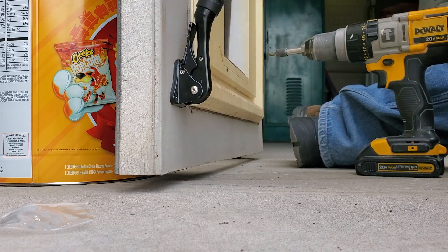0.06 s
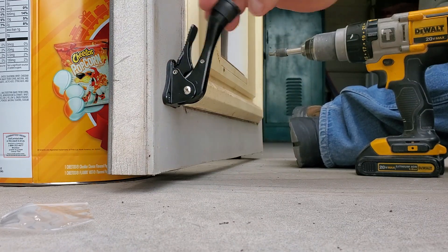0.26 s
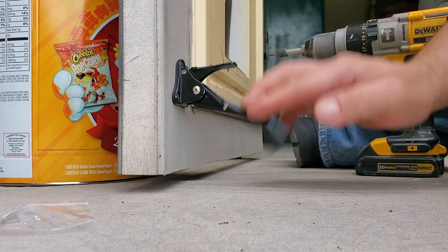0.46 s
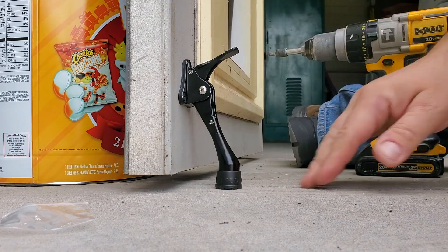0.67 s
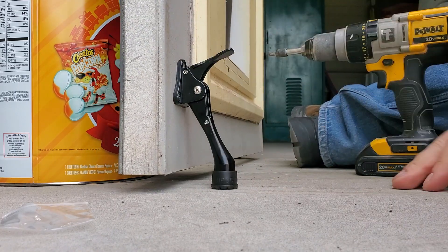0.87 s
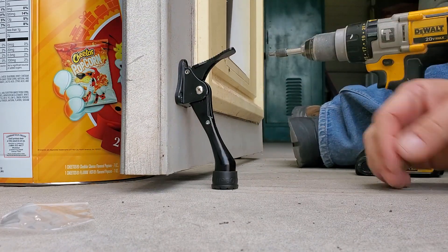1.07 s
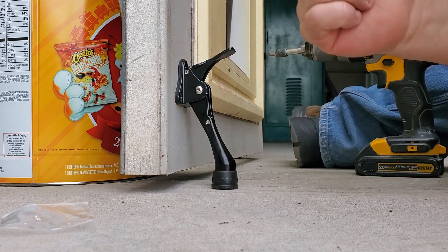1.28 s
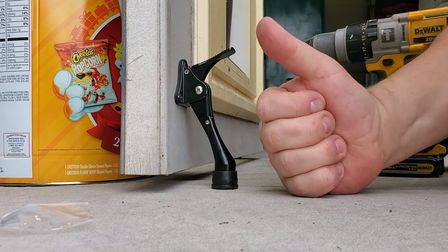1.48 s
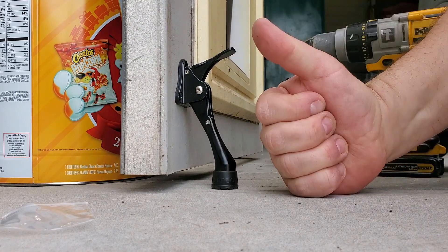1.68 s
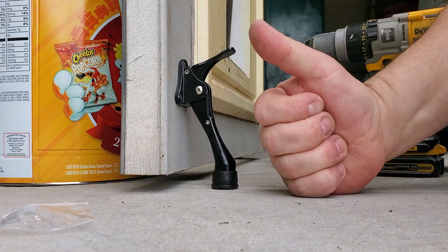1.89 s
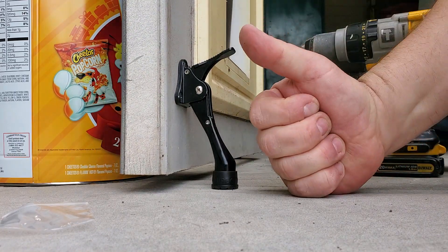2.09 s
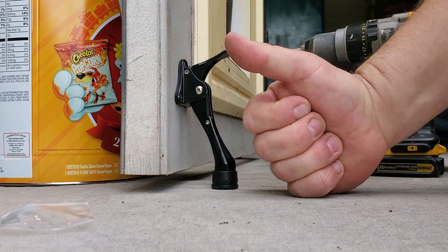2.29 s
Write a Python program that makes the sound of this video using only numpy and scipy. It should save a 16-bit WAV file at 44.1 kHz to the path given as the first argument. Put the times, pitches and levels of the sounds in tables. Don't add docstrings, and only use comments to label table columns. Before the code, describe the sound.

Sharp metallic clacks of a door stop flipping down, then one fleshy fist knock, over low engine hum.

```python
import sys
import numpy as np
from scipy import signal
from scipy.fft import rfft, irfft, next_fast_len
from scipy.io import wavfile

SR = 44100
rng = np.random.default_rng(int(sys.argv[2]) if len(sys.argv) > 2 else 0)


def undo_db(level):
    steps = np.asarray(level, float) / 20
    return 10 ** steps


def materialize(psi):
    bounded = np.clip(np.atleast_2d(psi).T, -1, 1)
    quanta = np.round(bounded * 32767).astype(np.int16)
    wavfile.write(sys.argv[1], SR, quanta)


N = 102885
SIZE = next_fast_len(N + 4096)

# [pitch_hz, level_db]
BRIGHT_HISS = [(5000, -51), (8500, -5), (11000, 0), (12200, 4), (13500, -2.5), (16000, -4)]


def rms_one(x):
    return x / np.sqrt(np.mean(x ** 2) + 1e-20)


def in_time(rows):
    return np.interp(np.arange(N) / SR, *np.transpose(rows))


def at_hz(points):
    hz, value = np.transpose(points)
    grid_hz = np.arange(SIZE // 2 + 1) * SR / SIZE
    return np.interp(np.log(grid_hz + 1), np.log(np.maximum(hz, 1)), value)


def colour(x, points):
    closed = [(points[0][0] / 2, -80), *points, (points[-1][0] * 2, -80)]
    return irfft(rfft(x, SIZE) * undo_db(at_hz(closed)), SIZE)[..., :N]


def drift(rate_hz):
    r = np.exp(-2 * np.pi * rate_hz / SR)
    warm_up = SR
    noise = rng.standard_normal(N + warm_up)
    return rms_one(signal.lfilter([1], [1, -2 * r, r * r], noise)[warm_up:])


def decay(x, t60_s):
    return signal.lfilter([1], [1, -undo_db(-60 / (t60_s * SR))], x + 1e-18)


def spikes(start_s, heights):
    return np.bincount((np.ravel(start_s) * SR).astype(int), np.ravel(heights), N)[:N]


def strike(start_s, level_db, modes, cycles=1.9, turn=-1):
    out = np.zeros(N)
    for k, (hz, mode_db, t60_s) in enumerate(modes):
        scatter_db = rng.normal(0, 1.5, len(start_s))
        hits = spikes(start_s, undo_db(level_db + mode_db + scatter_db)) * turn ** k + 1e-18
        w = 2 * np.pi * hz / SR
        build = np.exp(-2 * hz / SR / cycles)
        r = undo_db(-60 / (t60_s * SR))
        push = signal.lfilter([1 - build, 0, build - 1], [1, -2 * build * np.cos(w), build ** 2], hits)
        out += signal.lfilter([0, np.sin(w)], [1, -2 * r * np.cos(w), r * r], push)
    return out


def place(x, share):
    # [pitch_hz, lead_radians]
    left_lead = [(300, 1.05), (700, 0.68), (1060, 2.06), (2050, 1.18), (3200, 2.12), (12000, 1.2)]
    # [left_s, right_s, level_db]
    doorway_echoes = [(.0021, 0.0043, -14), (.0052, .0043, -22), (.0083, .0097, -26), (.0131, 0.013, -27)]
    right = irfft(rfft(x, SIZE) * np.exp(-1j * share * at_hz(left_lead)), SIZE)[:N]
    out = np.array([x, right])
    for k, (left_s, right_s, db) in enumerate(doorway_echoes):
        echo = np.array([np.roll(x, int(left_s * SR)), np.roll(x, int(right_s * SR))])
        out = out + share * (-1) ** k * undo_db(db) * echo
    return out


def wide_noise(points):
    # [pitch_hz, likeness from -1 to 1]
    likeness = [(60, 0.98), (130, 0.99), (290, 0.77), (640, 0.22), (1410, -0.73), (3100, 0.37),
                (6820, -0.22), (15000, -0.39)]
    alike = at_hz(likeness)
    mid, side = rfft(rng.standard_normal((2, SIZE)))
    pair = np.sqrt(1 + alike) * mid + np.sqrt(1 - alike) * side * [[1], [-1]]
    return rms_one(colour(irfft(pair, SIZE), points))


def street():
    # [pitch_hz, level_db]
    rumble_colour = [(15, -11), (25, -38), (43, -3.5), (107, -0.5), (129, -7.5), (162, -7.5), (221, -17),
                     (375, -22.5), (500, -25), (650, -63), (1100, -120)]
    # [pitch_hz, level_db]
    wash_colour = [(300, 4), (500, -0.5), (900, 4), (2000, -3), (3500, -16.5), (7000, -25), (7800, -32),
                   (16000, -95.5)]
    # [time_s, level_db]
    wash_level = [(0.0, -44.5), (2.0, -46), (2.33, -41)]
    # [pitch_hz, level_db]
    hiss_colour = [(8000, -14), (10500, -6), (12000, 0), (13500, -8), (14600, -14), (16000, -15)]
    rumble = undo_db(-34 + 1.2 * drift(8)) * wide_noise(rumble_colour)
    wash = undo_db(in_time(wash_level) + 0.13 * drift(24)) * wide_noise(wash_colour)
    hiss = undo_db(-73) * wide_noise(hiss_colour)
    return rumble + wash + hiss


def engine():
    # [time_s, firing_hz, half_pitch_db, firing_pitch_db]
    course = np.array([(0, 112.8, -49, -46.5), (.45, 114, -37, -36), (.9, 107.2, -43.5, -36.5),
                       (1.22, 110.1, -32, -38), (1.45, 113.4, -45.5, -39.5), (1.802, 106, -40.5, -41.5),
                       (2.33, 102.8, -37, -46)])
    hz, half_db, firing_db = (in_time(course[:, [0, k]]) for k in (1, 2, 3))
    turns = 2 * np.pi * np.cumsum(hz * (1 + 0.02 * drift(4.04))) / SR
    hum = np.zeros(N)
    for order, db in ((0.5, half_db), (1, firing_db)):
        wobble_db = 3.5 * drift(0.93)
        hum += undo_db(db + wobble_db) * np.sin(order * turns)
    return np.sqrt(2) * hum


def stroke(start_s, hold_s):
    t = np.arange(N) / SR
    rise = np.clip((t - start_s) / (0.25 * hold_s), 0, 1)
    t60_s = min(0.222, 2.37 * hold_s)
    return rise * undo_db(-60 * np.clip(t - start_s - hold_s, 0, 1) / t60_s)


def brushes():
    # [start_s, hold_s, level_db, tilt_db towards the bright part]
    rubs = [(0, 0.021, -61.5, 3), (0.29, .1, -68.5, -11), (0.48, 0.056, -58.5, 0), (0.429, 0.029, -37, 0),
            (0.56, 0.039, -40.5, -11), (1.192, 0.29, -66, -8), (.80, .09, -66.5, -1),
            (0.92, 0.059, -65.5, 1), (1.031, 0.029, -48.5, -8), (1.057, 0.061, -52, -1),
            (1.148, 0.034, -55.5, -7), (1.4768, 0.014, -42.5, 3), (1.496, 0.036, -69, 3),
            (1.61, 0.0027, -57.5, -11), (1.626, 0.0047, -56, -21.5), (1.637, 0.089, -66.5, -6),
            (1.715, 0.078, -61.5, 0.5), (1.868, 0.063, -65, -3)]
    # [pitch_hz, level_db]
    low_colour = [(900, 5.5), (2800, 1), (5000, 1.5), (7000, 0), (8500, -34), (16000, -64)]
    # [start_s, hold_s, level_db]
    grips = [
        (0.278, 0.042, -40),
        (0.325, 0.092, -46),
        (1.043, 0.023, -64),
    ]
    # [pitch_hz, level_db]
    grip_colour = [(250, 12.5), (500, 6.5), (1200, -5.5), (2200, -6.5), (4000, -19)]
    grains_per_s = 4600 * undo_db(2 * drift(20))
    grains = (rng.random((2, N)) < grains_per_s / SR) * rng.standard_normal((2, N))
    low = rms_one(colour(grains, low_colour))
    top = rms_one(colour(grains[::-1], BRIGHT_HISS))
    dull = rms_one(colour(grains.sum(axis=0), grip_colour))
    out = sum(undo_db(db) * stroke(start_s, hold_s) for start_s, hold_s, db in grips) * dull
    for start_s, hold_s, db, tilt_db in rubs:
        friction = low * undo_db(-tilt_db / 2) + top * undo_db(tilt_db / 2)
        out = out + undo_db(db) * stroke(start_s, hold_s) * friction
    return out


def metal_ticks():
    # [start_s, bracket_db, pin_db, spring_db, crack_db]
    ticks = [(0.4287, -16.5, -23, -27, -20.5), (.432, -24.5, -23, -29, -37), (0.4496, -25, -37, -30, -28),
             (0.457, -37, -52, -33, -32), (0.462, -34, -51, -40, -27.5), (.500, -51, -49.5, -53, -48),
             (0.562, -47, -54, -70, -24), (0.5705, -12, -31, -56, -10.5), (.578, -25, -40, -60, -22),
             (0.586, -35, -53, -65, -22.5), (0.593, -31, -52, -65, -34), (.602, -43, -50, -65, -32),
             (0.614, -42, -41, -65, -45), (.624, -35, -60, -65, -31), (.7062, -29, -30, -45, -21),
             (0.7073, -10.5, -46, -48, -20), (0.7125, -35, -54, -55, -20), (0.717, -31, -55, -60, -26),
             (0.7569, -29.5, -54, -60, -32), (0.7605, -26, -58, -65, -35), (0.771, -39, -70, -70, -49)]
    # [pitch_hz, level_db, t60_s]
    bracket = [(2630, -18, 0.0132), (3054, -5, .02), (3280, 0, 0.016), (3350, -7, 0.019),
               (3514, -5.5, .012), (3730, -19.5, 0.014), (4200, -4.5, 0.019), (4650, -9, 0.024),
               (5350, -11, 0.021), (5850, -24, 0.018), (6400, -17.5, 0.024), (6620, -14.5, 0.014)]
    # [pitch_hz, level_db, t60_s]
    pin = [(10400, -18, .01), (12290, 0, .045), (14450, -9, .06)]
    # [pitch_hz, level_db, t60_s]
    spring = [(15540, 0, .05), (15660, -3, .05)]
    # [pitch_hz, level_db]
    crack_colour = [(420, -11), (560, 14.5), (900, 13), (3000, -1), (6800, -11.5), (8300, -27),
                    (11000, -14.5), (16000, -25)]
    start_s, bracket_db, pin_db, spring_db, crack_db = np.transpose(ticks)
    rings = np.zeros(N)
    for level_db, part in ((bracket_db, bracket), (pin_db, pin), (spring_db, spring)):
        rings += strike(start_s, level_db, part, turn=0.99)
    blows = spikes(start_s, undo_db(crack_db))
    white = rng.standard_normal((3, N))
    crack = undo_db(-2.5) * decay(blows, 0.027) * rms_one(colour(white[0], crack_colour))
    alike = 0.18
    spread = np.sqrt(alike) * white[0] + np.sqrt(1 - alike) * white[1:]
    pin_blows = spikes(start_s, undo_db(pin_db))
    fizz = undo_db(3) * decay(pin_blows, 0.012) * rms_one(colour(spread, BRIGHT_HISS))
    rattle = undo_db(-18.5) * decay(blows, 0.26) * rms_one(colour(spread, crack_colour))
    return place(rings + crack, share=0.82) + fizz + rattle


def door_knocks():
    # [start_s, low_panel_db, high_panel_db, leg_db, arm_db]
    knocks = [(.4292, -24.5, -29, -22.5, -26.5), (0.4321, -19, -17.5, -24, -34), (.441, -45, -38, -34, -28),
              (.4505, -28, -32, -25, -25), (.455, -38, -36, -36, -33), (.4645, -27.5, -31, -28, -35),
              (.500, -34, -38, -52, -61), (.5693, -19.5, -23, -25, -11.5), (.5732, -24, -28, -38, -24),
              (0.5766, -18.5, -16, -36, -35), (.5806, -25, -35, -22, -23.5), (.587, -30, -43, -18, -20.5),
              (.5965, -24.5, -19, -21, -28), (.604, -20, -41, -32, -41), (.613, -32, -41, -40, -33),
              (.620, -31, -42, -30, -30), (.627, -28, -34, -28, -32), (.7077, -24.5, -10.5, -7, -22),
              (.7100, -33, -27, -40, -13), (.7185, -26, -36, -28, -44), (.726, -25.5, -33, -16, -32),
              (.732, -32.5, -25, -29, -45), (.7580, -36, -27, -37, -28), (.7612, -30, -28, -21, -25.5),
              (.7645, -25.5, -26, -20, -34), (.772, -34, -29, -32, -32.5)]
    # [pitch_hz, level_db, t60_s]
    panel_low = [(466.5, 0, 0.059), (537, -11, 0.02)]
    # [pitch_hz, level_db, t60_s]
    panel_high = [(704, 0, 0.022), (739, -3, 0.032), (840, -12, 0.014)]
    # [pitch_hz, level_db, t60_s]
    leg = [(1068, 0.5, 0.024), (1264, -18, 0.028), (1470, -10, 0.032), (1660, -11, .02)]
    # [pitch_hz, level_db, t60_s]
    arm = [(1922, -3, 0.025), (2043, 2, 0.021), (2234, -14.5, 0.048)]
    start_s, *levels_db = np.transpose(knocks)
    rings = np.zeros(N)
    for level_db, part in zip(levels_db, (panel_low, panel_high, leg, arm)):
        rings += strike(start_s, level_db, part, turn=0.83)
    return place(rings, share=0.82)


def foot_landing():
    # [start_s, level_db]
    landings = [
        (0.57, -18),
        (.580, -15),
        (0.588, -21.5),
        (0.601, -21.5),
        (0.612, -21.5),
        (.621, -23),
    ]
    # [pitch_hz, level_db, t60_s]
    thud = [(84.9, -4.5, 0.27), (150, -3.5, 0.066), (171.5, 1, 0.068), (252, -3.5, 0.0643),
            (350, -6, 0.051)]
    start_s, level_db = np.transpose(landings)
    return strike(start_s, level_db, thud)


def grit():
    # [start_s, level_db, pitch_hz, t60_s]
    ticking_grains = [
        (1.628, -40, 3100, .008),
        (1.629, -43, 1900, .008),
        (1.661, -47, 2750, .025),
        (1.327, -54, 3600, .02),
    ]
    ticking = sum(strike([s], db, [(hz, 0, t60_s)]) for s, db, hz, t60_s in ticking_grains)
    return place(ticking, share=0.4)


def fist():
    # [start_s, knuckle_db, palm_db, thud_db]
    contacts = [
        (1.481, -23, -38, -52),
        (1.4812, -14, -28, -36),
        (1.4840, -19, -15.5, -10.5),
        (1.491, -22, -36, -19),
    ]
    # [pitch_hz, level_db, t60_s]
    knuckle = [(810, 1, 0.0041), (1090, -2.5, 0.003), (1440, 0.5, 0.0037), (2090, -10, 0.0037),
               (2920, -10, .003), (4440, -23.5, .008)]
    # [pitch_hz, level_db, t60_s]
    palm = [(513, -2, 0.014), (687, -5.5, .01), (1540, -9.5, .012), (1783, -1.5, 0.016), (2080, -7, 0.0089)]
    # [pitch_hz, level_db, t60_s]
    floor_thud = [(92.5, 3, 0.058), (172, -2.5, 0.037), (285, -15, 0.038)]
    start_s, knuckle_db, palm_db, thud_db = np.transpose(contacts)
    skin = strike(start_s, knuckle_db, knuckle, cycles=0.8) + strike(start_s, palm_db, palm)
    return place(skin, share=0.4) + strike(start_s, thud_db, floor_thud, cycles=0.15, turn=1)


def scene():
    background = street() + engine()
    stop = metal_ticks() + door_knocks() + foot_landing()
    hand = brushes() + grit() + fist()
    return background + stop + hand


def low_pass(x):
    return signal.sosfilt(signal.butter(12, 16950, fs=SR, output="sos"), x)


def record(dry):
    # [pitch_hz, level_db]
    port_balance = [(60, 1.5), (130, 1), (290, 0.5), (640, 3), (1410, 5), (3100, 5), (6820, 5),
                    (15000, -5.5)]
    tilt_db = at_hz(port_balance) / 2 * [[1], [-1]]
    ports = irfft(rfft(dry, SIZE) * undo_db(tilt_db), SIZE)[:, :N]
    ports = signal.sosfilt(signal.butter(3, 40, "high", fs=SR, output="sos"), ports)
    ports = signal.sosfilt(signal.cheby2(14, 40, 16180, fs=SR, output="sos"), ports)
    ceiling = 0.96
    ports = ports / (1 + (ports / ceiling) ** 8) ** (1 / 8)
    return low_pass(ports)


dry = scene()
out = record(dry)
materialize(out)
```